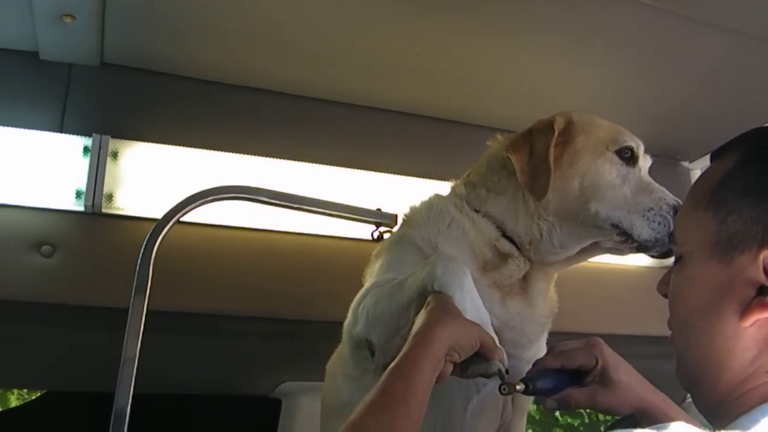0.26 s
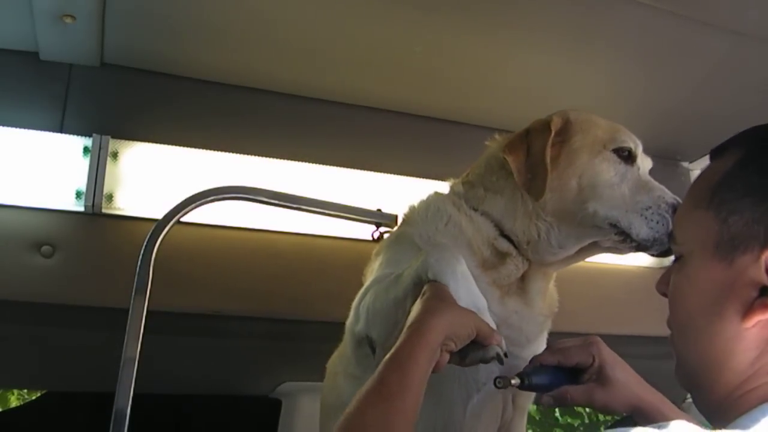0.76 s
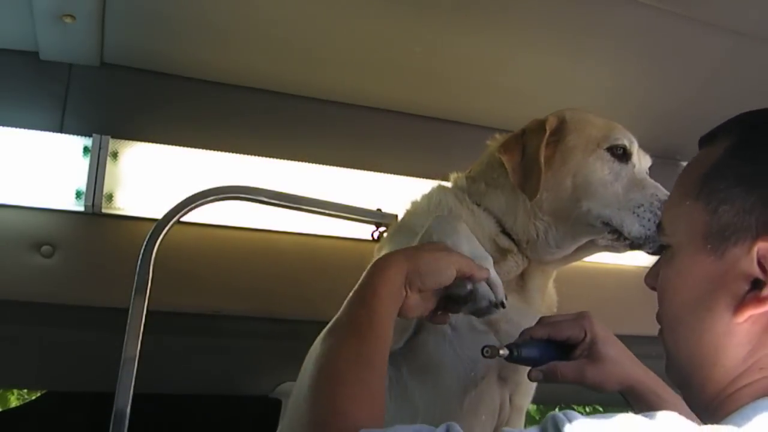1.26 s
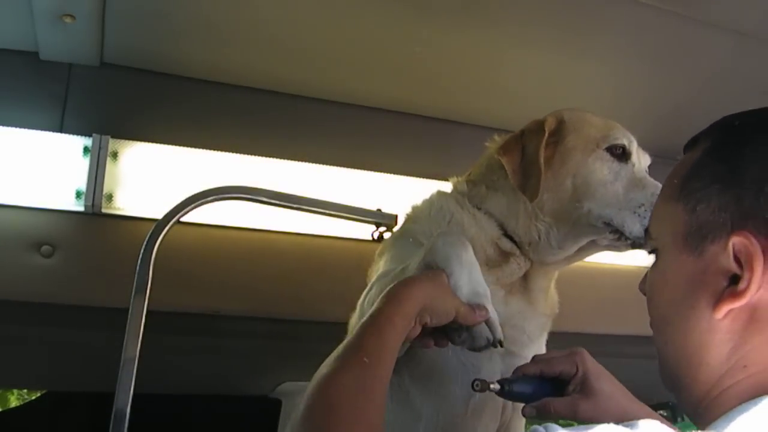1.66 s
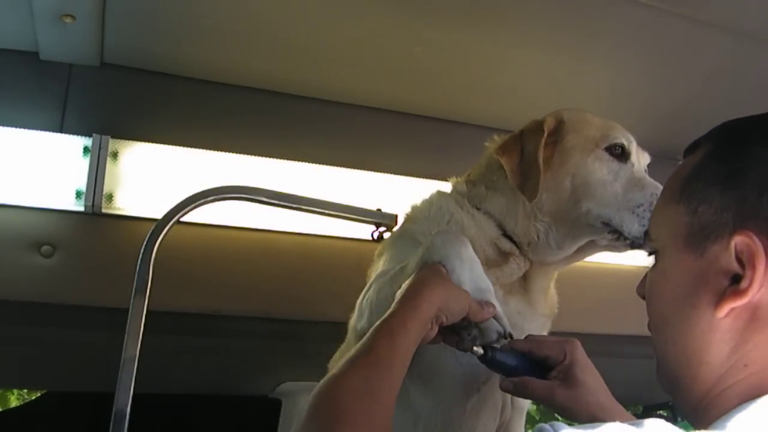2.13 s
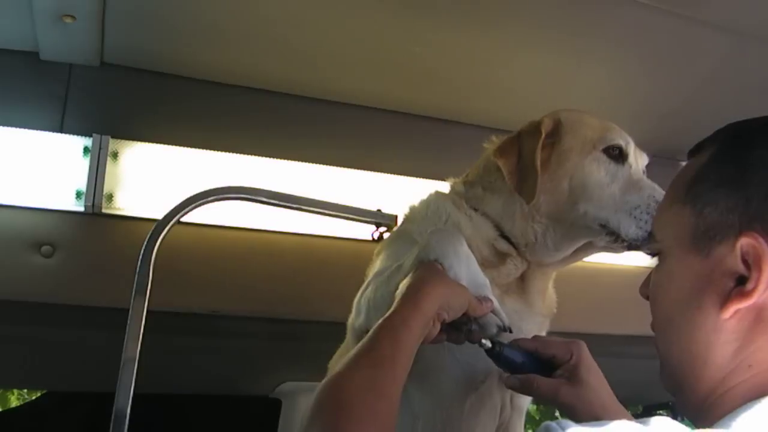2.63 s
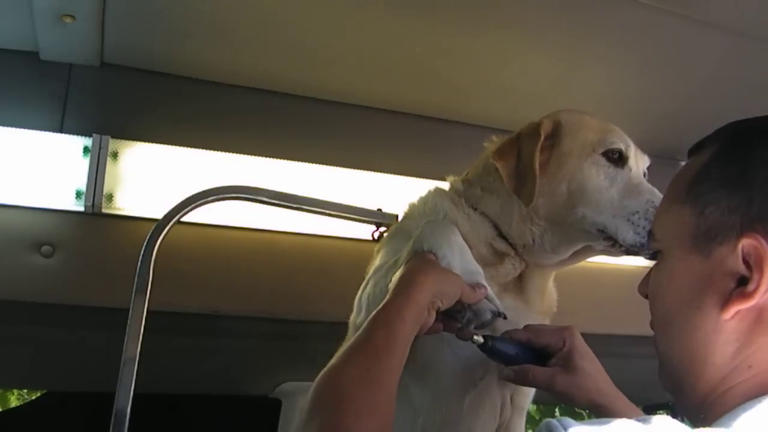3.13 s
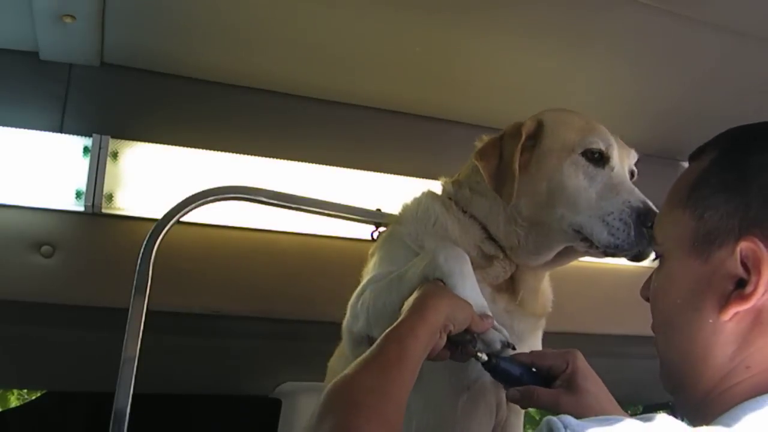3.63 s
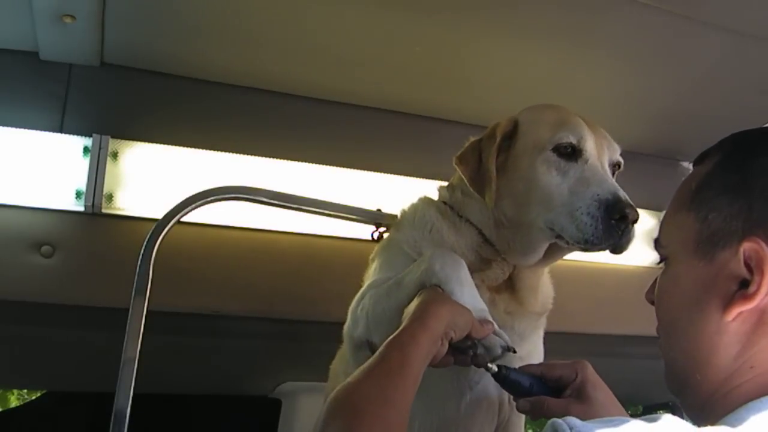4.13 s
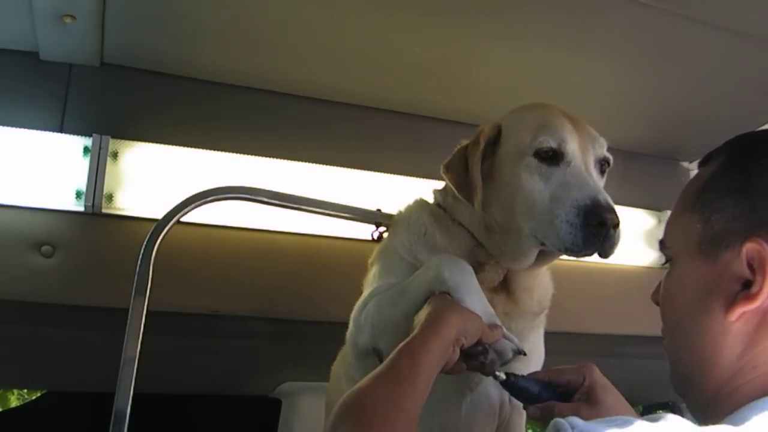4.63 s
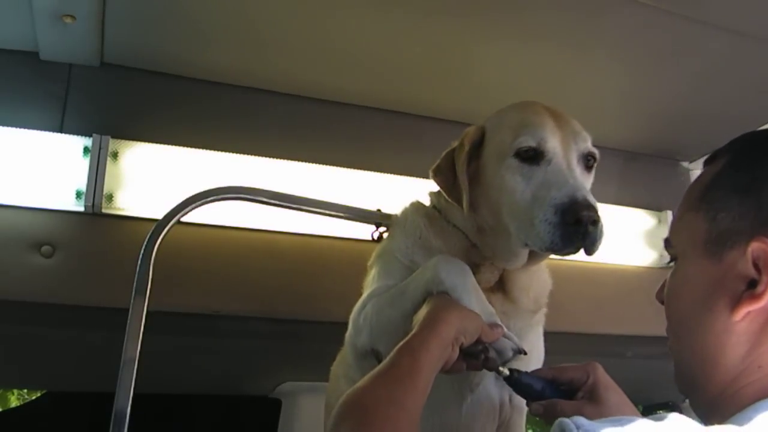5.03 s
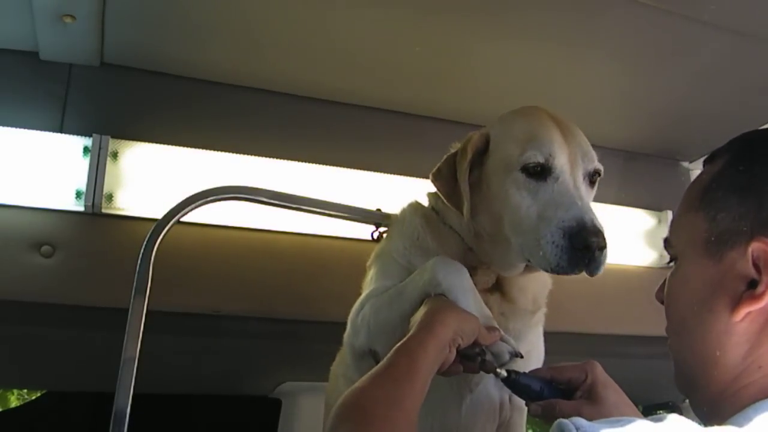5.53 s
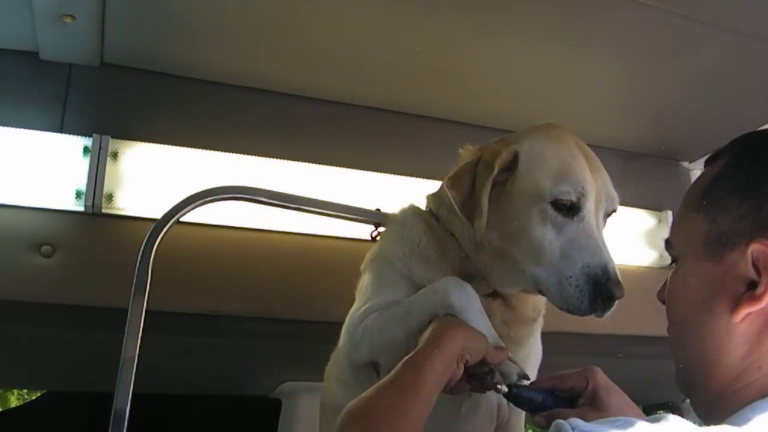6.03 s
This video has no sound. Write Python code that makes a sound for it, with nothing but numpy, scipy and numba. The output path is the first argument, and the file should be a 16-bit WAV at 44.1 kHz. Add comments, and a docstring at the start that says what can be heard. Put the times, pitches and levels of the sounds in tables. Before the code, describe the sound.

A small handheld rotary grinder whines steadily inside a van, its pitch sagging as it rasps in short touches on a dog's nail.

```python
"""A handheld rotary grinder whines in a van: its shaft sings on its multiples over bearing hiss.
Three touches of the sanding drum on a nail rasp and drag the speed down within the first 0.7 s;
then it runs free until 2.5 s, when the touches return, on and off to the end. From about 3.6 s the
opened dial lifts the pitch. Throughout, a hard-walled tail follows the tool, filtered noise gives
low rumble and engine drone from outside, and the microphone adds a faint steady treble hiss."""
import sys
import numpy as np
from scipy import signal
from scipy.fft import rfft, irfft, next_fast_len
from scipy.io import wavfile
from scipy.ndimage import uniform_filter1d, map_coordinates
from numba import njit

SR = 44100
rng = np.random.default_rng(int(sys.argv[2]) if len(sys.argv) > 2 else 0)


def digitize_waveform(pressure):
    """Quantize a signal to 16-bit integers and store it at the path in sys.argv[1].

    Rows of a 2-D input are taken as channels; values are limited to [-1, 1].
    """
    field = np.atleast_2d(pressure).T
    bounded = np.clip(field, -1, 1)
    quanta = np.round(bounded * 32767).astype(np.int16)
    wavfile.write(sys.argv[1], SR, quanta)


N = 276948
T = np.arange(N) / SR  # s

# Motor: speed it pulls towards with no load; the thumb opens the dial late on [t/s, f/Hz]
FREE_SPEED = [(0.0, 380.6), (0.6, 381.1), (1.5, 379.7), (2.5, 378.7), (3.0, 378.7), (3.6, 375.9),
              (4.0, 391.8), (4.4, 404.2), (4.8, 422), (5.3, 432.6), (5.8, 435.6), (6.28, 434.7)]
START_HZ, SPIN_UP_S = 368.2, 0.265  # speed just before the start; time constant of speed changes

# How the tool is held [t/s, casing tone gain/dB, upper casing hum level/dB, vent whine level/dB,
# bearing hiss level/dB, hand motion/0-1]
HOLD = [(0.0, -46, -23, -18.5, -27.5, 0.74), (0.16, -47, -28.5, -20.5, -27.5, 0.57),
        (0.4, -51, -26, -20.5, -28.5, 0.82), (0.86, -47, -21.5, -22, -25.5, 0.77),
        (1.03, -45.5, -24.5, -18.5, -24, 0.02), (1.75, -45, -22, -19.5, -24.5, .05),
        (2.24, -43, -22.5, -19, -23, .05), (2.5, -45.5, -25, -19, -21.5, 0.03),
        (2.62, -45, -21, -18, -28, 0.71), (2.97, -45.5, -25, -23, -22.5, .7),
        (3.3, -47, -27, -22, -27, 0.63), (3.73, -44, -25.5, -22, -24.5, 0.61),
        (4.2, -47.5, -22, -21, -26.5, 0.91), (4.4, -48.5, -24.5, -22.5, -29, 0.99),
        (4.55, -47, -28.5, -21, -25, 1), (4.71, -49, -26.5, -27, -29, 1), (4.82, -47, -23, -25, -24, 1),
        (4.94, -47, -24.5, -25, -28, 0.96), (5.18, -46.5, -22.5, -25.5, -27.5, 0.99),
        (5.7, -44, -23, -23, -26, 0.76), (6.28, -46.5, -20, -25, -23, 0.75)]

# Casing and cabin: broad slope for the seven lowest multiples [f/Hz, gain/dB]
CASING_SLOPE = [(340, -4.5), (375, -1), (700, -2), (790, 6.5), (1100, 8), (1200, 7.5), (1450, 16),
                (1630, 3), (1760, 1.5), (2200, 10.5), (2700, 17.5), (2900, 17.5)]
# Resonances on top of that slope [f/Hz, width/Hz, gain/dB]
CASING_RINGS = [(1512, 6.7, 18.6), (1815, 27, 14.7), (1855, 23, 12), (1935, 34.6, 22.8), (2032, 160, 16),
                (2278, 34, 22.9), (2407, 68, 19.4), (2538, 36, 15.8), (2641, 30, 22.9), (2873, 76.6, 15.4)]
# Balance of the three lowest multiples against the next four [t/s, gain/dB]
UNBALANCE = [(0, 0), (.4, 4.5), (.7, 1.5), (1.5, -2.5), (2.2, 0.5), (3.0, 1), (3.7, 1.5), (4.3, 0.5),
             (5.0, 1.5), (5.7, -0.5), (6.28, -1.5)]

# Upper casing hum, then vent whine: relative tone levels [multiple of the shaft, level/dB]
UPPER_TONES = [(8, -4), (9, -6), (10, -6.5), (11, -6.5), (12, -4.5), (13, -8.5), (14, -8), (15, -4),
               (16, -2), (17, -4), (18, -5), (19, -8.5)]
VENT_FROM = 13  # first multiple of the vent whine
TOP_ORDERS = range(20, 40)  # highest whine tones, falling evenly
TOP_DB, TOP_FALL_DB = -14, -0.85  # relative level of the first; change per multiple

# Single tones that swell or dip for a moment [middle t/s, length/s, multiple, peak change/dB]
SWAYS = [(0.6, 1.2, 1, -4), (0.6, .6, 2, 3), (0.652, 0.22, 7, 7), (0.723, 0.28, 6, 9),
         (0.774, 0.65, 16, 4.5), (0.798, 0.45, 12, 0), (0.85, 0.45, 8, 4), (0.898, 0.16, 9, 7),
         (1.07, .3, 22, 8), (1.07, 0.33, 24, 8), (1.9, 1.6, 25, 3.5), (1.9, 1.4, 28, 2),
         (1.091, 0.2, 9, -18), (1.161, 0.31, 8, -12), (1.1, .3, 7, 3), (1.38, .4, 6, -4),
         (1.39, 0.47, 7, -13), (1.4, .4, 4, 3), (1.712, 0.54, 15, 11), (1.71, 0.31, 3, -8),
         (1.71, 0.4, 1, -4), (2.063, 0.28, 5, -14), (2.19, 0.35, 16, -10), (2.324, 0.7, 18, 3),
         (2.373, 0.3, 17, -11), (2.71, 0.22, 7, 5), (2.727, 0.17, 5, 3.5), (2.726, 0.55, 8, -12),
         (2.995, 0.55, 7, -5), (3.555, 0.33, 5, 4.5), (3.45, 0.46, 28, 10), (3.05, 0.82, 9, 4.5),
         (3.65, 0.53, 1, 2), (4.32, .2, 1, -8.5), (4.45, .15, 4, -8), (4.621, 0.16, 6, 12),
         (4.97, .15, 3, -10), (5.23, .15, 3, -6), (5.49, .3, 2, 6), (5.75, .1, 3, 8), (4.81, 0.26, 5, 7),
         (5.016, 0.13, 5, 2.5), (5.185, 0.11, 5, 3.5), (5.394, 0.065, 5, 3.5), (5.603, .2, 6, 1),
         (5.705, 0.095, 7, 4), (5.96, 0.64, 15, 7.5), (6.058, 0.67, 18, -8)]
FADE_DEPTH, FADES_PER_S = 0.74, 22  # echo depth and random echo steps a second, at full hand motion
FADE_TOP = 1.14  # highest gain the echo can give
FLICKER_TOP = 16  # above this multiple the quick flicker grows no further
FLARE_DB = 4  # chance lifts a tone by no more than this

# Drum on a nail [start t/s, length/s, drag at start/Hz, drag at end/Hz, grit hiss level/dB,
# drum ring level/dB, knock through paw and tool level/dB, swell over the touch/dB, first bite/0-2]
TOUCHES = [(0.099, 0.11, 38, 60, -31, -18, -25.5, -1, 0),
           (0.321, 0.12, 76, 57.5, -27.5, -19.5, -23, -5, 0.13),
           (0.64, 0.027, 0, 56, -28, -17.5, -23.5, -5, .3),
           (2.481, 0.081, 0, 47.5, -24.5, -14.5, -45, -6, 0),
           (2.598, 0.041, 125.5, 0, -22.5, -17, -22, -5, 0),
           (2.655, 0.075, 45, 18, -28.5, -18.5, -31, 1, 0),
           (2.978, 0.038, 0, 99, -22, -14.5, -19.5, -8, 1.5),
           (3.259, 0.043, 184, 32, -23.5, -15.5, -20.5, -4, 1.7),
           (3.719, 0.08, 33, 19.5, -36, -25, -30, 0, 0),
           (3.956, 0.077, 81.5, 142, -29.5, -15, -21, -5, 0.21),
           (4.11, 0.06, 106, 52, -27, -16.5, -24.5, -4, .4),
           (4.209, 0.15, 51.5, 79, -26.5, -17.5, -27, 1, 0.42),
           (4.489, 0.072, 18, 115, -27.5, -15, -43, -8, 0.24), (4.578, 0.08, 77, 62, -30, -20, -28, 4, 0),
           (4.803, 0.092, 118, 133, -28, -15, -29, 0, 0.011),
           (5.052, 0.076, 96, 99, -25.5, -15, -24, -3, 0.59),
           (5.283, 0.086, 99, 116, -26.5, -15.5, -21, -2, 0.29),
           (5.521, 0.066, 31.5, 64.5, -28, -17, -23.5, 0, 0.18),
           (5.674, 0.133, 44, 186, -27, -18.5, -24.5, 2, 0.24),
           (6.011, 0.06, 113, 1.5, -36, -20, -28, 5, 0), (6.196, 0.096, 102, 44.5, -35, -18.5, -30, 6, 0)]
BITE_S, LET_GO_S = 0.0014, 0.0076  # decay time constants of the first bite and the release
SOFT_START_S = 0.006  # extra ease-in of a touch without bite
REPEAT_SHARE = 0.65  # share of rasp power that comes round again every turn

# Grains cutting the nail: relative noise spectrum [f/Hz, level/dB per Hz]
GRIT = [(4000, -39), (7500, -2), (9000, 4), (11000, -1.5), (13000, -5), (15800, -4.5)]
# Sanding drum ringing: relative noise spectrum [f/Hz, level/dB per Hz]
RING = [(3000, -32), (4800, -4.5), (5800, -1), (6600, 1), (7400, -14.5), (10000, -42)]
# Paw and tool knocking: relative noise spectrum [f/Hz, level/dB per Hz]
BODY = [(500, -80), (900, -12.5), (1500, -3), (2500, -1), (4000, -2.5), (6000, -35), (10000, -49)]

# Bearings: relative noise spectrum [f/Hz, level/dB per Hz]
BEARING_HISS = [(300, -62), (650, -27), (800, -15.5), (1500, -11.5), (2500, -10.5), (4400, -9.5),
                (5800, -3), (7000, -8), (8500, -12.5), (11000, -19.5), (15800, -40)]

VAN_T60_S, VAN_DB = 0.2, -14  # time for the tail to fall 60 dB; tail level against the direct sound

# Rumble through the walls: relative noise spectrum [f/Hz, level/dB per Hz]
RUMBLE = [(12, -35), (20, 1), (123, -4.5), (186, -8), (320, -7), (375, -12.5), (419, -8), (614, -13.5),
          (732, -10), (900, -9), (1170, -9), (1980, -120)]
RUMBLE_DB = -46.5
# Distant engine: two drone bands [f/Hz, width/Hz]
DRONE = [(70, 5.3), (130, 12)]
# Level of each drone band [t/s, lower band level/dB, upper band level/dB]
DRONE_LEVELS = [(0.0, -63, -43), (0.09, -51, -52), (0.52, -76, -70), (1.07, -53, -54), (2.19, -57, -48),
                (2.22, -54.5, -52.5), (3.02, -46, -54), (4.78, -55, -57), (5.51, -57, -60),
                (6.28, -58, -55)]

# Steady faint treble hiss of the microphone: relative noise spectrum [f/Hz, level/dB per Hz]
MIC_HISS = [(3000, -26), (9000, 5), (12000, -8), (15800, -2)]
MIC_HISS_DB = -36
# Microphone housing: narrow cancellations [f/Hz, width/Hz, depth/0-1]
NOTCHES = [(4837, 354, 1), (7650, 480, 1), (7765, 530, 1), (10030, 74, 0.3)]
GAIN_TOP_DB, GAIN_RATIO = -15.5, 1.45  # gain control threshold and ratio
GAIN_ATTACK_S, GAIN_RELEASE_S = 0.0088, 0.089  # envelope time constants
TOP_HZ = 15720  # upper edge of the microphone channel


def motor(hz, turns, unrest):
    """Tones on the multiples of the shaft; they tremble, most in the treble and while speed changes."""
    casing_db, hum_db, whine_db, _, motion = curves(HOLD)
    motion = np.clip(motion, 0.01, 1)
    turns = turns + (0.0044 + 0.0063 * unrest) * walk(90)  # the shaft runs a little early or late
    shaky = 0.9 + 0.5 * motion

    def tone(k, slow_db):
        flicker_db = 0.08 * min(k, FLICKER_TOP) * shaky + 2.8 * unrest * min(k / 5, 1) + 0.5
        chance_db = slow_db * shaky * walk(6) + flicker_db * walk(40)
        level = amp(sways(k) + np.minimum(chance_db, FLARE_DB))
        return np.sqrt(2) * level * np.cos(2 * np.pi * (k * turns + rng.random()))

    low = []
    for k in range(1, 8):
        echo = fading(motion * min(k / 4, 1) ** 2)
        low.append(casing(k * hz) * echo * tone(k, slow_db=0.6))
    low = amp(curves(UNBALANCE)[0]) * sum(low[:3]) + sum(low[3:])

    hum = sum(amp(db) * tone(k, slow_db=2.5) for k, db in UPPER_TONES if k < VENT_FROM)
    whine = sum(amp(db) * tone(k, slow_db=1.0) for k, db in UPPER_TONES if k >= VENT_FROM)
    for j, k in enumerate(TOP_ORDERS):
        whine = whine + amp(TOP_DB + TOP_FALL_DB * j) * tone(k, slow_db=4.0)
    return amp(casing_db) * low + amp(hum_db) * unit(hum) + amp(whine_db) * unit(whine)


def speed():
    """The shaft eases towards its free speed less the drag of each touch."""
    goal = curves(FREE_SPEED)[0]
    for start, length, first, last, *_ in TOUCHES:
        along = (T - start) / length
        pressed = (along >= 0) & (along < 1)
        goal = goal - pressed * (first + (last - first) * np.clip(along, 0, 1))
    keep = np.exp(-1 / (SPIN_UP_S * SR))
    return signal.lfilter([1 - keep], [1, -keep], goal, zi=[keep * START_HZ])[0]


def casing(hz):
    """Gain of casing and cabin at a moving frequency: resonance power added to a broad slope."""
    at, db = np.transpose(CASING_SLOPE)
    grid = np.arange(300., 3001.)  # Hz
    power = amp(np.interp(np.log(grid), np.log(at), db)) ** 2
    for f, width, ring_db in CASING_RINGS:
        power = power + amp(ring_db) ** 2 / (1 + (2 * (grid - f) / width) ** 4)
    return np.interp(hz, grid, np.sqrt(power))


def fading(motion):
    """Direct sound and a wandering echo add and cancel, faster and deeper when the hand moves."""
    step = np.cumsum(motion) * FADES_PER_S / SR
    rows = rng.standard_normal((2, 400))
    in_phase, across = (np.interp(step, np.arange(len(row)), row) for row in rows)
    depth = FADE_DEPTH * np.sqrt(motion)
    gain = np.hypot(1 + depth * in_phase, depth * across) / np.sqrt(1 + depth ** 2)
    return np.minimum(gain, FADE_TOP)


def sways(k):
    """Smooth swells and dips of one multiple, dB."""
    db = np.zeros(N)
    for middle, length, order, change_db in SWAYS:
        if order == k:
            db = db + change_db * np.cos(np.pi * np.clip((T - middle) / length, -0.5, 0.5)) ** 2
    return db


def touches(turns):
    """Rasp on the nail: first bite, chatter while pressed, short let-go."""
    force = np.zeros((3, N))
    for start, length, _, _, grit_db, ring_db, knock_db, swell_db, bite in TOUCHES:
        near = slice(int(start * SR), int((start + length + 0.06) * SR))
        since = np.clip(T[near] - start, 0, 1)
        along = np.minimum(since / length, 1)
        rise_s = 0.0015 + SOFT_START_S * np.clip(1 - 2 * bite, 0, 1)
        shape = np.clip(since / rise_s, 0, 1)
        shape = shape * np.exp(-np.clip(since - length, 0, 1) / LET_GO_S)
        shape = shape * (1 + bite * np.exp(-since / BITE_S))  # the first grains catch hardest
        shape = shape * amp(swell_db * (along - 0.5))
        force[:, near] += shape * amp([[grit_db], [ring_db], [knock_db]])

    chips = unit(rng.standard_normal(N) * amp(1.6 * rng.exponential(size=N)))
    rub = np.sqrt(REPEAT_SHARE) * grit(turns) + np.sqrt(1 - REPEAT_SHARE) * chips
    rub = rub * once_a_turn(turns, depth=0.25) * amp(2.0 * walk(150))
    cut, ring, knock = force
    knock = uniform_filter1d(knock, int(0.0068 * SR))  # the heavier parts follow more slowly
    return cut * colour(rub, GRIT) + ring * colour(rub, RING) + knock * colour(rub, BODY)


def grit(turns, wear=30., count=128):
    """Grains pass the nail in the same order every turn and wear into a new order, wear times a second."""
    rows = rng.standard_normal((int(N / SR * wear) + 2, count))
    place = [T * wear, turns % 1 * count]
    return unit(map_coordinates(rows, place, order=1, mode="grid-wrap"))


def once_a_turn(turns, depth):
    """A level that beats with the shaft, rms 1."""
    return unit(np.exp(depth * np.cos(2 * np.pi * turns)))


def bearings(turns, db):
    """Hiss of bearing grains, uneven in strength, that beats once a turn."""
    grains = rng.standard_normal(N) * amp(2.2 * np.minimum(rng.exponential(size=N), 5))
    flutter_db = 0.7 * walk(25)
    return amp(db + flutter_db) * colour(grains * once_a_turn(turns, depth=0.13), BEARING_HISS)


def van(x):
    """Close hard walls: a short dense tail of decaying noise."""
    t = np.arange(int(0.3 * SR)) / SR
    tail = rng.standard_normal(len(t)) * np.exp(-np.log(1000) * t / VAN_T60_S)
    tail = tail * (t > 0.003)  # gap before the walls answer
    tail = tail / np.sqrt(np.sum(tail ** 2))
    return x + amp(VAN_DB) * signal.fftconvolve(x, tail)[:N]


def outside():
    """Rumble through the walls, with a wavering engine drone of narrow-band noise."""
    out = amp(RUMBLE_DB + 0.42 * walk(2.58)) * colour(rng.standard_normal(N), RUMBLE)
    for (hz, width), db in zip(DRONE, curves(DRONE_LEVELS)):
        band = signal.lfilter(*signal.iirpeak(hz, hz / width, SR), rng.standard_normal(N))
        out = out + amp(db) * unit(band)
    return out


def mic_hiss():
    """Steady faint treble hiss of the microphone: filtered noise at one level."""
    return amp(MIC_HISS_DB) * colour(rng.standard_normal(N), MIC_HISS)


def amp(db):
    """Decibels to amplitude."""
    return 10 ** (np.asarray(db) / 20)


def unit(x):
    """Scale to rms 1."""
    return x / np.sqrt(np.mean(x ** 2))


def walk(rate):
    """Random values, rate a second, joined by straight lines; rms about 1.25."""
    knots = rng.standard_normal(int(N / SR * rate) + 2)
    return 1.53 * np.interp(T * rate, np.arange(len(knots)), knots)


def colour(x, spectrum):
    """Filter to (f/Hz, level/dB) points, rms 1."""
    hz, db = np.transpose(spectrum)
    size = next_fast_len(N)
    bins = np.arange(size // 2 + 1) * SR / size + 1  # 1 Hz up, to keep the logarithm finite
    gain = amp(np.interp(np.log(bins), np.log(hz), db))
    return unit(irfft(rfft(x, size) * gain, size)[:N])


def curves(table):
    """The columns of a table after its time column, at every sample."""
    s, *columns = np.transpose(table)
    return [np.interp(T, s, column) for column in columns]


@njit
def follow(x, attack, release):
    """Envelope that rises quickly and falls slowly."""
    out, e = np.empty(len(x)), x[0]
    for i in range(len(x)):
        e += (x[i] - e) * (attack if x[i] > e else release)
        out[i] = e
    return out


def scene():
    """Tool and nail in the van, rumble behind; both channels alike."""
    hz = speed()
    turns = np.cumsum(hz) / SR
    speed_change = uniform_filter1d(np.abs(np.gradient(hz)) * SR, int(0.08 * SR))  # Hz per s
    unrest = np.clip(speed_change / 150, 0, 1)
    hiss_db = curves(HOLD)[3]
    tool = motor(hz, turns, unrest) + touches(turns) + bearings(turns, hiss_db)
    inside = van(tool + mic_hiss())  # the steady hiss takes the tail too
    return np.tile(inside + outside(), (2, 1))


def record(dry):
    """The housing cancels narrow bands; gain control leans on loud moments, peaks round, the top is cut."""
    for hz, width, depth in NOTCHES:
        notched = signal.lfilter(*signal.iirnotch(hz, hz / width, SR), dry)
        dry = (1 - depth) * dry + depth * notched
    rms = np.sqrt(np.abs(uniform_filter1d(dry[0] ** 2, size=256)))
    heard = follow(rms, 1 / (GAIN_ATTACK_S * SR), 1 / (GAIN_RELEASE_S * SR))
    dry = dry * np.minimum(amp(GAIN_TOP_DB) / heard, 1) ** (1 - 1 / GAIN_RATIO)
    rounded = np.tanh(1.25 * dry) / 1.25
    top_cut = signal.ellip(12, 0.3, 80, TOP_HZ, fs=SR, output="sos")
    return signal.sosfilt(top_cut, rounded)


dry = scene()
out = record(dry)
digitize_waveform(out)
```